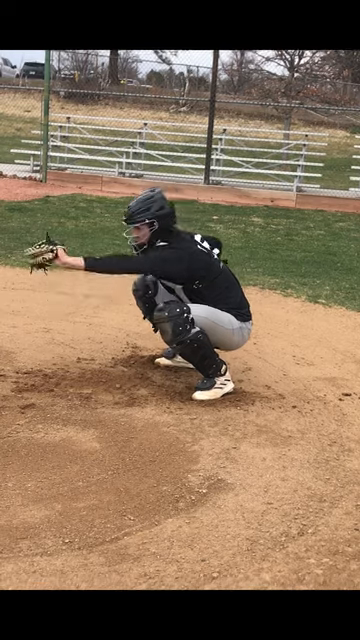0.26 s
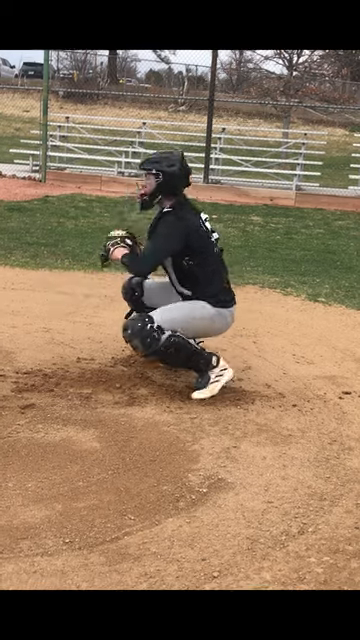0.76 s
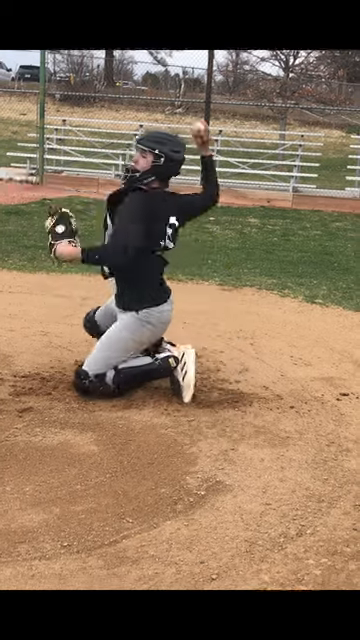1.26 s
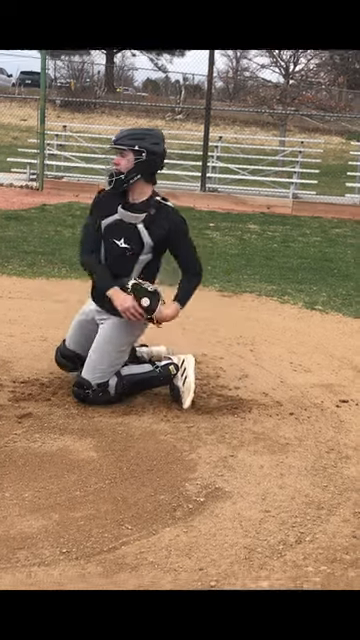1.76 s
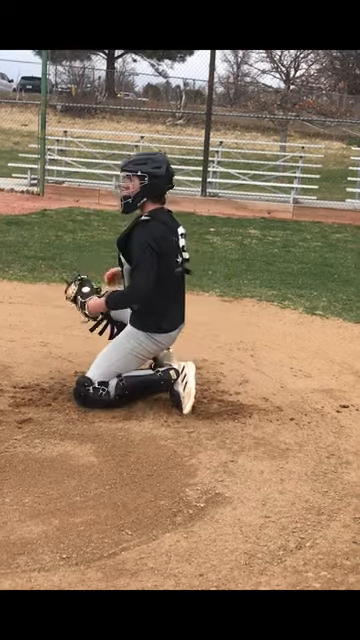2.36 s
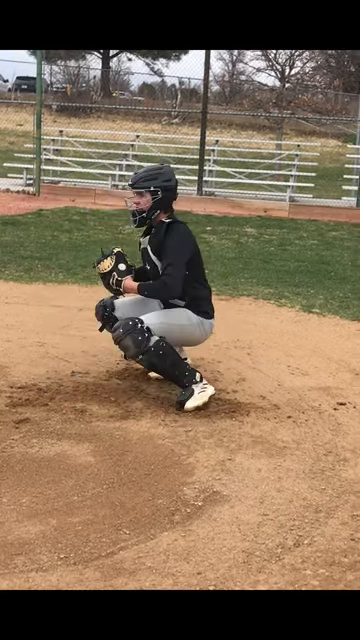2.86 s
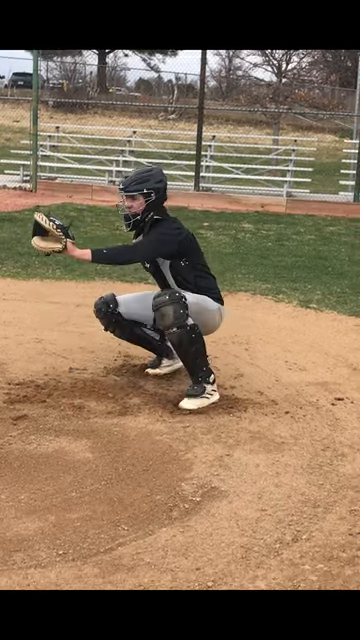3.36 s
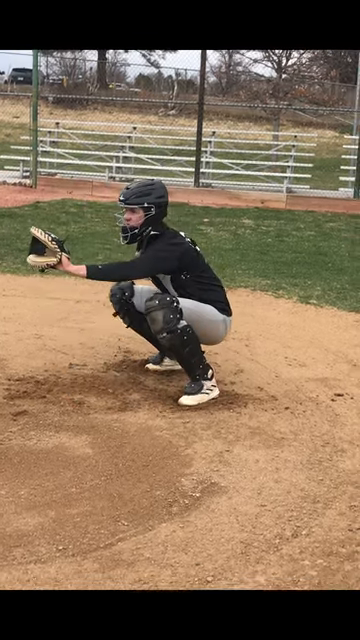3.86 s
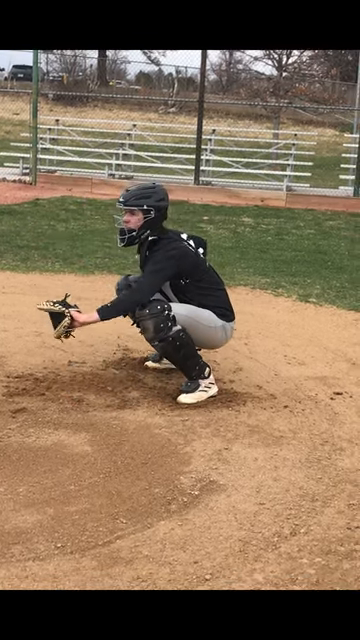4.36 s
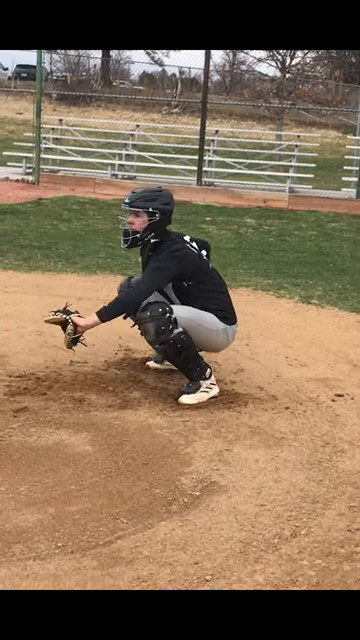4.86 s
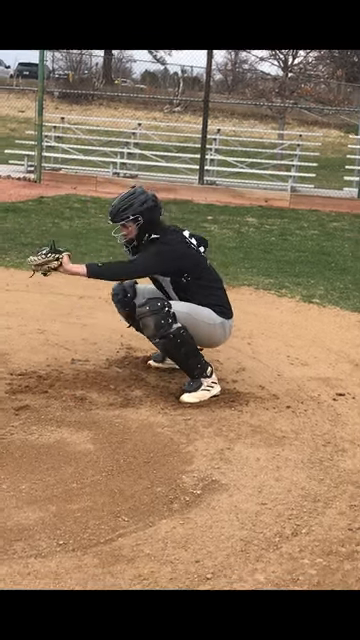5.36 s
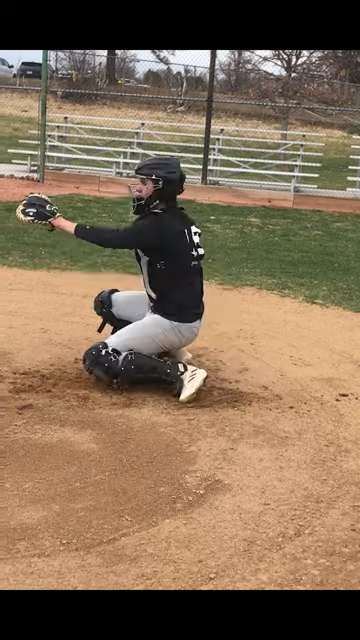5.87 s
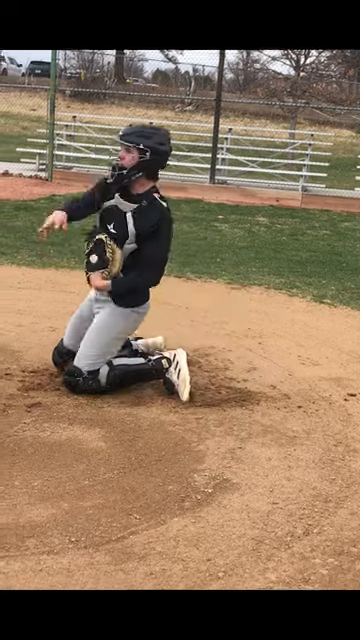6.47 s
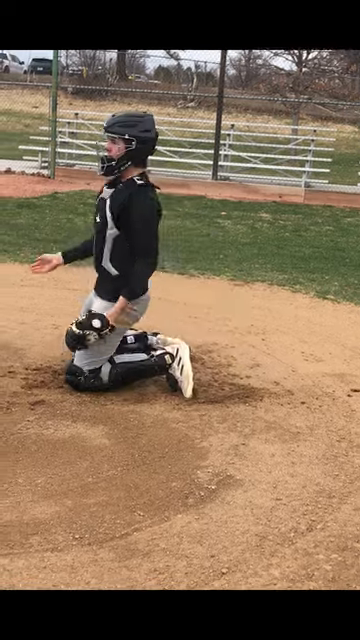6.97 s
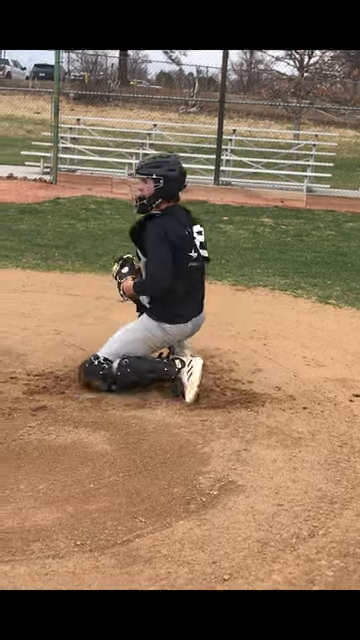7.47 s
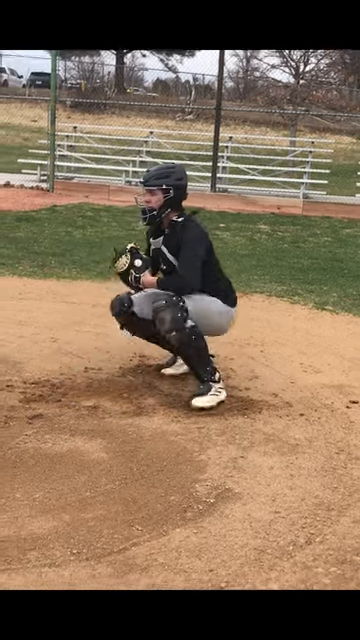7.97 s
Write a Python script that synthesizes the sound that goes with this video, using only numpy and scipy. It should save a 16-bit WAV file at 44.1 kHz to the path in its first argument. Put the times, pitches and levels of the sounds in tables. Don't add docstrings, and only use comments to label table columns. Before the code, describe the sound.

Wind rumbles and flutters on a phone microphone at an open ball field over faint far traffic. At 0.27 s a ball cracks loudly into a close leather mitt, a brief hollow pop with quick bright reflections from fence and bleachers. A faint, clear crow call rises around 0.8 s, and another falls at 1.6 s. From 1.2 to 1.9 s pads and cloth rustle, buckles tick and straps creak. At 2.1 s a ball pops into the far mitt, with its echo following. A scuff at 2.6 s leads into calm, with light gusts near 4.5 s. At 5.2 s the near mitt snaps again, crackly and bright. From 6 s strong gusts buffet and thump; gear rustles, with a sharp click at 6.3 s. The far mitt pops at 7.0 s. Hoarse distant caws come at 7.2, 7.5 and 8 s, with loud clicks and scuffing around 7.4 to 7.5 s.

```python
import sys
import numpy as np
from scipy import signal
from scipy.fft import rfft, irfft
from scipy.io import wavfile
from scipy.ndimage import uniform_filter1d

SR = 44100
rng = np.random.default_rng(int(sys.argv[2]) if len(sys.argv) > 2 else 0)


def boost_factor(decibels):
    exponent = np.asarray(decibels, float) / 20
    return 10 ** exponent


def wrap_up_sound(samples):
    columns = np.atleast_2d(samples).T
    tamed = np.clip(columns, -1, 1)
    steps = np.round(tamed * 32767).astype(np.int16)
    wavfile.write(sys.argv[1], SR, steps)


N = 362502

# time_s, rumble_db
BREEZE = [(0, -33), (.3, -42), (.42, -35), (.8, -44), (.95, -50), (1.4, -47), (2.0, -60), (2.6, -52),
          (3.3, -58), (4.2, -53), (5.2, -50), (5.93, -54), (6.0, -33), (6.6, -31), (7.0, -35), (7.28, -41),
          (7.6, -31), (8.1, -35)]
# peak_s, rumble_db, half_length_s, flutter_relative_db (above 160 Hz)
GUSTS = [(.07, -26, .04, -16), (.2, -25, .04, -9), (.384, -31, .03, -8), (.52, -31, .03, -9),
         (.68, -34, .04, -18), (1.0, -34, .05, -18), (1.176, -38, .02, -25), (1.49, -30, .045, -24),
         (1.71, -37, .03, -24), (4.45, -40, .03, -20), (4.53, -35, .03, -22), (4.715, -34, .04, -18),
         (5.825, -41, .03, -26), (6.025, -27, .03, -6), (6.11, -24, .03, -8), (6.244, -25, .04, -4),
         (6.39, -25, .02, -8), (6.47, -26, .06, -9), (6.57, -28, .03, -4), (7.63, -27, .08, -5),
         (6.67, -25, .03, -12), (6.73, -27, .03, -1), (6.82, -29, .03, -9), (6.92, -27, .03, -8),
         (7.165, -24, .02, -13), (7.21, -29, .03, -11), (7.36, -30, .04, -4), (7.5, -30, .04, -2),
         (7.87, -28, .05, -14), (8.2, -26, .05, -13)]
# frequency_hz, level_db (per Hz)
WIND_SPECTRUM = [(12, -53.5), (20, -13), (54, 3.5), (70, 5), (111, -0.5), (181, -6.5), (287, -12.5),
                 (428, -27), (536, -35.5), (700, -33.5), (910, -65.5), (1540, -120)]
# frequency_hz, level_db (per Hz)
TRAFFIC_SPECTRUM = [(12, -39.5), (20, -11), (59, -3), (90, -0.5), (119, -6.5), (158, -9.5), (268, -12),
                    (469, -21), (916, -10.5), (2300, -37), (3910, -41), (4890, -43.5), (7640, -43),
                    (8790, -42.5), (15800, -53)]
# peak_s, level_db, half_length_s, dull_relative_db (below 3.5 kHz)
SCUFFS = [(.5, -72, .05, 14), (.8, -75, .3, 6), (1.205, -57, .06, -4), (1.35, -62, .05, -1),
          (1.45, -61, .06, -4), (1.6, -67, .08, 8), (1.68, -60, .04, 0), (1.81, -63, .05, 0),
          (1.95, -73, .12, 8), (2.35, -75, .1, 10), (2.48, -69, .06, -2), (2.575, -54, .05, -2),
          (2.7, -80, .1, 18), (3.05, -67, .02, -15), (3.335, -62, .025, 1), (5.1, -70, .1, -10),
          (5.45, -75, .08, -1), (5.74, -72, .025, -8), (5.95, -75, .15, 3), (6.08, -63, .03, -2),
          (6.155, -57, .06, -1), (6.24, -61, .04, 0), (6.312, -59, .015, 8), (6.45, -59, .07, -4),
          (6.62, -62, .06, 0), (6.75, -65, .04, 2), (6.853, -61, .007, 0), (7.41, -56, .04, -3),
          (7.47, -47, .022, 3), (7.5, -49, .04, 2), (7.7, -80, .3, 18)]
# middle_s, level_db, half_length_s, dull_relative_db (below 3.5 kHz)
SHUFFLES = [
    (.2, -73, .09, 4),
    (1.5, -68, .4, -1),
    (1.76, -71, .22, 11),
    (2.55, -77, .4, 8),
    (3.2, -80, .25, 3),
    (6.42, -65, .4, 0),
    (7.24, -72, .14, 13),
]
# frequency_hz, level_db (per Hz)
CLOTH_SPECTRUM = [(880, -19.5), (1500, 3), (2360, -4.5), (3570, -10.5), (4890, -15), (6900, -15),
                  (7690, -13), (11100, -16), (14300, -26.5), (15800, -29.5)]
# start_s, peak_db, pitch_hz
CLICKS = [(.245, -46, 2000), (0.7412, -48, 2560), (0.7901, -49.5, 3330), (1.1643, -46, 3570),
          (1.2002, -49.5, 2870), (1.3324, -53, 3120), (1.4072, -51.5, 3440), (1.4544, -50.5, 3950),
          (1.6094, -40, 2830), (1.6721, -46, 2500), (1.7294, -49.5, 2790), (1.8094, -52, 2820),
          (2.3401, -44, 2580), (2.4483, -44, 2660), (2.5686, -47, 2510), (3.0494, -48, 8700),
          (3.3378, -52, 2840), (6.0676, -43, 2800), (6.1494, -49, 3640), (5.733, -52, 8000),
          (6.005, -52, 5000), (6.2199, -43, 10500), (6.2324, -44, 10500), (6.2365, -36, 3000),
          (6.417, -46, 8500), (6.452, -42, 8700), (6.3116, -25, 2620), (6.3709, -53, 2850),
          (6.5335, -39, 2910), (6.6094, -53, 2910), (6.745, -46, 1800), (6.8528, -42, 3310),
          (7.2105, -46, 2740), (7.2494, -45, 2310), (7.3981, -33, 3550), (7.426, -38, 4650),
          (7.4545, -28.5, 3460), (7.435, -42, 8000), (7.4616, -32, 3460), (7.4994, -33, 1900),
          (7.529, -40, 4000)]
# start_s, ring_db, ring_hz, ring_t60_s, crack_db
CATCHES = [
    [(.2676, -14, 1300, .006, -8), (.2677, -22, 3500, .004, -40), (.2682, -11, 1600, .005, -30),
     (.2694, -2, 815, 0.0105, -31.5), (.2734, -11, 720, 0.011, -26), (.2736, -24, 2000, .005, -40),
     (.2712, -11, 240, 0.015, -43)],
    [(2.0922, -55, 1490, .02, -57), (2.0969, -9, 1350, .006, -13), (2.0972, -22, 5200, .004, -40),
     (2.0976, -7.5, 800, .0065, -30), (2.0985, -27, 4500, .004, -40), (2.0988, -4.5, 710, 0.0065, -36),
     (2.101, -15.5, 205, 0.015, -37)],
    [(5.199, -19, 2200, 0.005, -28), (5.1996, -30, 2570, .005, -14), (5.1999, -15, 1620, 0.007, -30),
     (5.2, -13, 740, 0.016, -30), (5.2006, -11, 1560, 0.0055, -22), (5.2011, -16, 1170, .007, -40),
     (5.2024, -24, 2200, .005, -19), (5.2041, -15, 760, 0.014, -24), (5.2035, -20, 2960, .006, -28),
     (5.2045, -23, 4000, .005, -28), (5.2065, -15, 760, .011, -30), (5.2065, -20, 275, 0.03, -59)],
    [(7.0023, -53, 1500, .02, -39), (7.0056, -15, 1218, 0.004, -6.5), (7.0062, -9, 950, 0.006, -30),
     (7.0072, -9, 780, .007, -36), (7.0087, -15, 235, 0.018, -41.5), (7.0105, -26, 760, .01, -40)],
]
# loss_db (at 10 kHz), slap_hz, slap_db
MITTS = [
    (1, 2500, -8),
    (-12, 2900, -3),
    (-1, 3000, 1.5),
    (-12, 1700, -1),
]
# frequency_hz, level_db (per Hz)
CRACK_SPECTRUM = [(700, -24.5), (1500, -10.5), (2500, 1), (5000, -4), (8000, -4.5), (11500, -14.5),
                  (16000, -29.5)]
# delay_s, level_db, colour_hz, width_hz
NEAR_ECHOES = [(.0235, -42, 6000, 6000), (.0503, -30, 7500, 7000), (.058, -29, 2180, 2500),
               (.0757, -15, 9000, 8000), (.063, -25, 2600, 3000), (.082, -22, 3000, 2500),
               (.107, -24, 2200, 2500), (.117, -32, 1800, 1500), (.135, -34, 2500, 4030)]
# delay_s, level_db, colour_hz, width_hz
RAISED_ECHOES = [(.026, -36, 6000, 7500), (.036, -36.5, 1990, 4030), (.045, -39, 6000, 8000),
                 (.0765, -32.5, 7150, 7940), (0.106, -53, 3500, 3000), (.1205, -33, 1800, 700),
                 (0.1265, -24.5, 11000, 5970), (.136, -34, 2000, 900)]
# delay_s, first_db, second_db, colour_hz, width_hz
FAR_ECHOES = [(.0187, -19, -28, 1400, 2500), (.0187, -30, -26, 7000, 4000), (.0205, -40, -24, 2200, 1500),
              (.056, -40, -32, 2000, 1500), (.0645, -25, -21, 1500, 1200), (.065, -28, -34, 5500, 3000),
              (.0775, -35, -31, 5000, 7000), (.083, -33, -30, 8500, 4000), (.0868, -22, -27, 1800, 2500),
              (.087, -19, -16, 7000, 7000), (.0905, -23, -19, 2800, 1500), (.091, -27, -36, 7500, 2500),
              (.096, -29, -16, 6100, 1800), (.1, -19, -27, 6000, 4000), (.1002, -20, -15, 2800, 1300),
              (.1055, -27, -30, 8000, 2500), (.105, -32, -24, 2400, 1500), (.111, -24, -30, 1100, 900),
              (.1215, -17, -21, 7800, 6000), (.1245, -10, -9, 3050, 1100), (.1225, -21, -26, 900, 600),
              (.145, -24, -27, 1000, 700), (.1455, -40, -28, 2200, 1500), (.089, 0.5, 0.5, 260, 250)]
# delay_s, level_db
NEAR_SCATTER = [(0, -32), (.02, -53), (.05, -47), (.08, -37), (.125, -39.5), (0.149, -56), (.3, -87)]
# delay_s, level_db
FAR_SCATTER = [(0, -30), (.03, -37), (0.072, -54), (0.092, -28.5), (.125, -28.5), (.16, -46), (.3, -63)]
# frequency_hz, level_db
SCATTER_SPECTRUM = [(200, -21.5), (800, -11.5), (1500, -1.5), (3000, 1), (6000, -4), (10000, -5),
                    (16000, -14)]
# colour_hz, width_hz, level_db
PLANKS = [(1100, 900, 0), (2000, 1200, 0), (3000, 1500, 3), (5800, 2000, 0), (8500, 3000, -6),
          (12500, 4000, -4)]
# start_s, top_pitch_hz, level_db
CAWS = [
    (7.155, 621, -53.5),
    (7.535, 625, -51.5),
    (7.985, 645, -51),
]
# after_start_s, pitch_share, level_db, roughness_0_to_1
CAW_SHAPE = [
    (0, .8, -5, .5),
    (.055, 1.0, 0, .33),
    (.09, .95, 0, .42),
    (.14, .85, -1, .52),
    (.22, .78, -4, .6),
    (.3, .73, -10, .7),
]
# start_s, length_s, first_hz, last_hz, level_db
LONG_CALLS = [
    (.78, .41, 600, 800, -64),
    (1.56, .43, 635, 600, -58),
]
# pitch_hz, width_hz, level_db
THROAT = [(700, 400, -30), (1270, 460, 11), (1570, 290, 9), (2100, 300, -18), (3200, 700, -20),
          (3800, 900, -19), (6090, 500, -29)]
# start_s, length_s, pitch_hz, level_db
CREAKS = [
    (1.55, .21, 2830, -67),
    (1.6, .3, 2020, -68),
    (1.64, .1, 4300, -73),
    (6.38, .1, 5400, -70),
    (6.47, .2, 2950, -68),
    (6.5, .15, 3900, -71),
    (7.82, .18, 2030, -73),
]
# start_s, peak_db
THUMPS = [
    (6.012, -23),
    (6.099, -37),
    (6.244, -27),
    (6.388, -23),
    (6.734, -27),
    (7.158, -27),
    (7.355, -20.5),
    (7.494, -31),
    (7.609, -28),
]
# notch_hz, width_hz, level_db
MIC_DIPS = [(5000, 550, -5), (7700, 1100, -5.5), (10400, 1000, -4)]


def evened(x):
    return x / np.sqrt(np.mean(x ** 2) + 1e-20)


def decay(t, t60):
    return boost_factor(-60 * t / t60)


def read(points, hz):
    f, value = np.transpose(points)
    return np.interp(np.log(hz + 1), np.log(f + 1), value)


def add(mix, s, sound):
    part = mix[round(s * SR):][:len(sound)]
    part += sound[:len(part)]


def colour(x, gains_db):
    return irfft(rfft(x) * boost_factor(gains_db(np.fft.rfftfreq(len(x), 1 / SR))), len(x))


def split(x, hz):
    low = colour(x, lambda f: -10 * np.log10(1 + (f / hz) ** 8))
    high = colour(x, lambda f: -10 * np.log10(1 + (hz / (f + 1)) ** 8))
    return low, high


def resonate(x, hz, width):
    turn = np.exp(2j * np.pi * hz * np.arange(len(x)) / SR)
    r = np.exp(-np.pi * width / SR)
    return 2 * (turn * signal.lfilter([1 - r], [1, -r], x / turn)).real


def resonate_twice(x, hz, width):
    return resonate(resonate(x, hz, width), hz, width)


def lumps(seconds):
    size = max(int(seconds * SR), 1)
    return evened(uniform_filter1d(uniform_filter1d(rng.standard_normal(N), size), size))


def humps(rows, rise, steep):
    t = np.arange(0, N + 64, 64) / SR
    s, db, half, part_db = np.transpose(rows)[..., None]
    side = half * np.where(t < s, rise, 1)
    power = boost_factor(2 * db) * np.exp(-2 * (abs(t - s) / side) ** steep)
    both = (power, power * boost_factor(2 * part_db))
    return np.array([np.interp(np.arange(N) / SR, t, p.sum(0)) for p in both])


def wind():
    breeze_db = np.interp(np.arange(N) / SR, *np.transpose(BREEZE))
    breeze_flutter_db = -47 + 0.9 * (breeze_db + 35)
    rumble, flutter = humps(GUSTS, 0.7, 1.6)
    puffs = lumps(0.013)
    air = colour(rng.standard_normal(N), lambda f: read(WIND_SPECTRUM, f))
    low, high = split(air, 160)
    low = low / (abs(uniform_filter1d(evened(low) ** 2, 3000)) + 0.16) ** 0.12
    low = evened(low * boost_factor(0.5 * puffs)) * np.sqrt(rumble + boost_factor(2 * breeze_db))
    high = evened(high * boost_factor(2.0 * puffs + 3.0 * lumps(0.01)))
    return low + high * np.sqrt(flutter + boost_factor(2 * breeze_flutter_db))


def traffic():
    frames, hz = N // 256 + 5, np.fft.rfftfreq(1024, 1 / SR)
    a, b, patches = rng.standard_normal((frames, 513, 3)).T
    patches = evened(uniform_filter1d(uniform_filter1d(patches, 10, 0), 20, 1))
    z = (a + 1j * b) * boost_factor(read(TRAFFIC_SPECTRUM, hz)[:, None] + 0.81 * patches)
    road = signal.istft(z, nperseg=1024, noverlap=768)[1][:N]
    return boost_factor(-49.5) * evened(road)


def rustle():
    clumps_db = np.clip(2.5 * lumps(0.0015) + 2.1 * lumps(0.012), -9, 7)
    slips = rng.standard_normal(N) * boost_factor(clumps_db)
    dull, bright = split(colour(slips, lambda f: read(CLOTH_SPECTRUM, f)), 3500)
    bright_power, dull_power = humps(SCUFFS, 0.7, 1.6) + humps(SHUFFLES, 1, 4.0)
    return np.sqrt(bright_power) * evened(bright) + np.sqrt(dull_power) * evened(dull)


def patchy(x, depth_db):
    z = signal.stft(x, nperseg=256)[2]
    patches = rng.standard_normal(z.shape[::-1]).T
    patches = evened(uniform_filter1d(uniform_filter1d(patches, 7, 0), 22, 1))
    return signal.istft(z * boost_factor(depth_db * patches - 0.6), nperseg=256)[1][:N]


def click(db, hz):
    t = np.arange(600) / SR
    tick = rng.standard_normal(len(t)) * decay(t, 0.008)
    tick = 0.35 * tick + resonate(tick, hz, 2500)
    return boost_factor(db - 4.0) * tick / abs(tick).max()


def catch(contacts):
    start, t = contacts[0][0], np.arange(4000) / SR
    out = np.zeros(SR // 2)
    impulse = 1.0 * (np.arange(len(t)) == 14)
    snap = colour(impulse, lambda f: read(CRACK_SPECTRUM, f)) * (t < 0.004)
    snap = snap - 0.5 * np.roll(snap, 2)
    snap = snap / snap.max()
    for s, ring_db, hz, ring_t60, crack_db in contacts:
        turns = hz * (t + 0.00016 * (1 - np.exp(-t / 0.0012)))
        dying = (t / min(ring_t60, 13 / hz, 0.036)) ** 1.6
        attack = 1 - np.exp(-t * hz * 5.4)
        ring = -np.sin(2 * np.pi * turns) * boost_factor(ring_db - 60 * dying) * attack
        hiss = evened(colour(rng.standard_normal(len(t)), lambda f: read(CRACK_SPECTRUM, f)))
        fizz_t60 = 0.002 - 0.0009 * crack_db
        fizz = hiss * decay(t, fizz_t60) * (t > 0.0003)
        add(out, s - start, ring + boost_factor(crack_db) * (0.6 * fizz - 2.3 * snap))
    return out


def field(pop, dull_db, echoes, scatter, scatter_db):
    size, heard = len(pop), 2 * SR // 5
    out = colour(pop, lambda f: dull_db * (f / 10000) ** 2)
    thin = colour(pop, lambda f: read(SCATTER_SPECTRUM, f))
    for delay, db, hz, width in echoes:
        smear = rng.standard_normal(300) * boost_factor(-13) * decay(np.arange(300) / SR, 0.005)
        smear[0] = 1
        echo = signal.fftconvolve(thin[:3000], smear / np.linalg.norm(smear))
        add(out, delay, boost_factor(db) * resonate_twice(echo, hz, width))
    paths = 0
    for hz, width, plank_db in PLANKS:
        arrivals = rng.random(size) < 1000 / SR
        strength = boost_factor(2.0 * np.minimum(rng.exponential(1, size), 4))
        taps = rng.standard_normal(size) * arrivals * strength
        paths = paths + boost_factor(plank_db) * resonate_twice(taps, hz, width)
    delay, db = np.transpose(scatter)
    paths = paths * boost_factor(np.interp(np.arange(size) / SR, delay, db, right=-120) - 8.0 + scatter_db)
    blur = np.sqrt(abs(uniform_filter1d(abs(rfft(thin)) ** 2, size=900)))
    return out[:heard] + irfft(rfft(paths) * blur, size)[:heard]


def calls():
    out = []
    for s, hz, db in CAWS:
        out.append([(s + u, hz * share, db + g, rough) for u, share, g, rough in CAW_SHAPE])
    for s, length, first, last, db in LONG_CALLS:
        middle = (first + last) / 2 + 0.16 * abs(last - first)
        out.append([(s, first, db - 8, 0.4),
                    (s + length / 2, middle, db, 0.4),
                    (s + length, last, db - 8, 0.4)])
    return out


def crow(rows):
    s, *columns = np.transpose(rows)
    t = np.arange(s[0], s[-1], 1 / SR)
    hz, db, rough = (np.interp(t, s, c) for c in columns)
    wobble = uniform_filter1d(rng.standard_normal(len(t)), 150)
    turns = np.cumsum(hz * (1 + 0.79 * rough * wobble)) / SR
    folds = sum(np.cos(2 * np.pi * k * turns) for k in range(1, 12))
    puffs = (0.34 + np.exp(-(turns % 1) / 0.28)) * rng.standard_normal(len(t))
    drive = (1 - rough) * evened(folds) + rough * evened(puffs)
    throat = sum(boost_factor(g) * resonate(resonate_twice(drive, f, w), f, w) for f, w, g in THROAT)
    call = boost_factor(db) * evened(throat) * signal.windows.tukey(len(t), 0.1)
    trees = rng.standard_normal(9000) * decay(np.arange(9000) / SR, 0.17)
    trees[0] = 80.0
    return s[0], signal.fftconvolve(call, trees / np.linalg.norm(trees))


def creak(length, hz, db):
    slips = rng.standard_normal(round(length * SR))
    return boost_factor(db) * evened(resonate_twice(slips, hz, 45)) * signal.windows.tukey(len(slips), 0.5)


def thump(db):
    u = np.arange(-300, 900) / SR / 0.00095
    return boost_factor(db + 1.5) * (u ** 2 - 1) * np.exp(-u ** 2 / 2)


def scene():
    mix, cloth = wind() + traffic(), rustle()
    first_far = [(s, db, hz, width) for s, db, _, hz, width in FAR_ECHOES]
    second_far = [(s, db, hz, width) for s, _, db, hz, width in FAR_ECHOES]
    places = [(NEAR_ECHOES, NEAR_SCATTER, 3.0), (first_far, FAR_SCATTER, 0.8),
              (RAISED_ECHOES, NEAR_SCATTER, -5.5), (second_far, FAR_SCATTER, -0.8)]
    for s, db, hz in CLICKS:
        add(mix, s, click(db, hz))
    for contacts, (dull_db, hz, slap_db), place in zip(CATCHES, MITTS, places):
        pop = colour(catch(contacts), lambda f: slap_db * np.exp(-((f - hz) / 900) ** 2))
        add(mix, contacts[0][0], field(pop, dull_db, *place))
    for rows in calls():
        add(mix, *crow(rows))
    for s, *row in CREAKS:
        add(mix, s, creak(*row))
    for s, db in THUMPS:
        add(mix, s, thump(db))
    return (mix + patchy(cloth, 2.1))[None]


def low_pass(x):
    return signal.sosfilt(signal.butter(12, 15940, fs=SR, output="sos"), x)


def record(dry):
    x = signal.sosfilt(signal.butter(4, 35, "high", fs=SR, output="sos"), dry[0])
    for hz, width, db in MIC_DIPS:
        x = x + (boost_factor(db) - 1) * resonate(x, hz, width)
    return low_pass(x[None])


dry = scene()
out = record(dry)
wrap_up_sound(out)
```